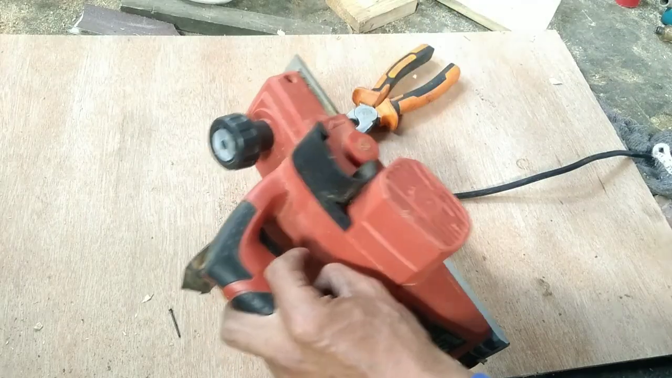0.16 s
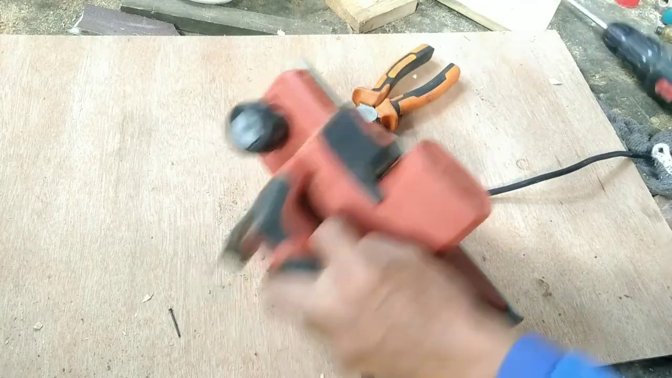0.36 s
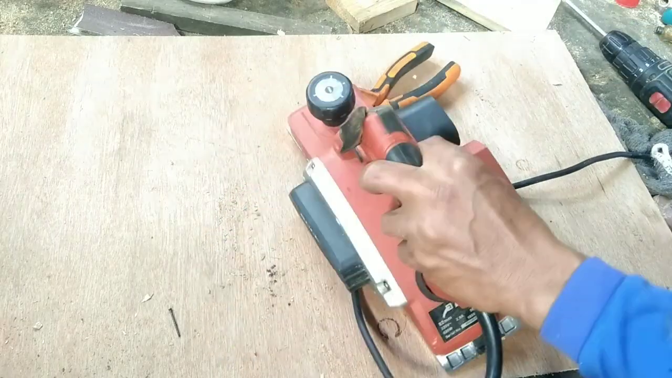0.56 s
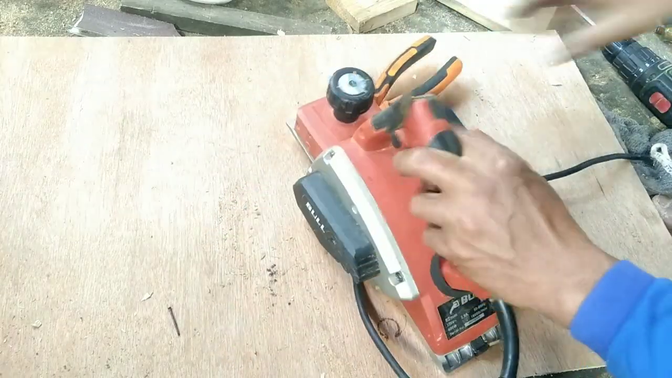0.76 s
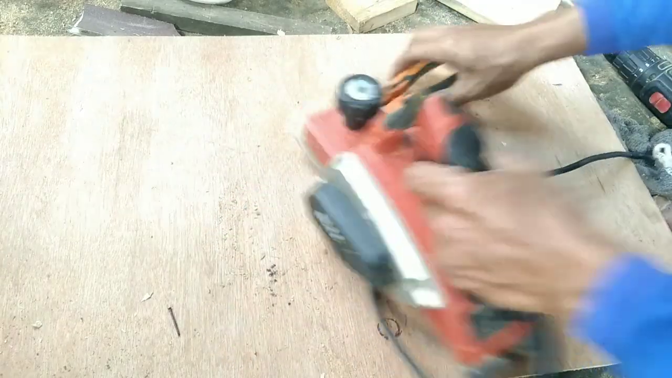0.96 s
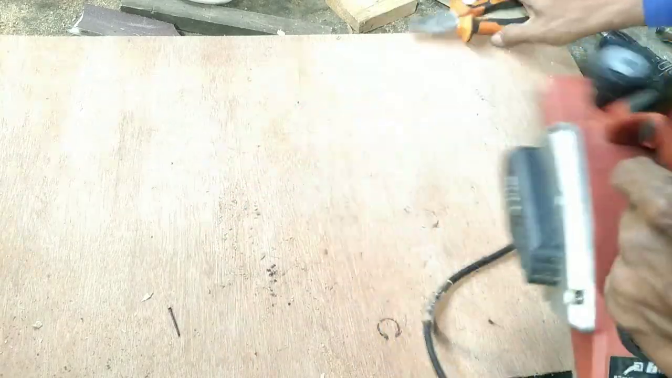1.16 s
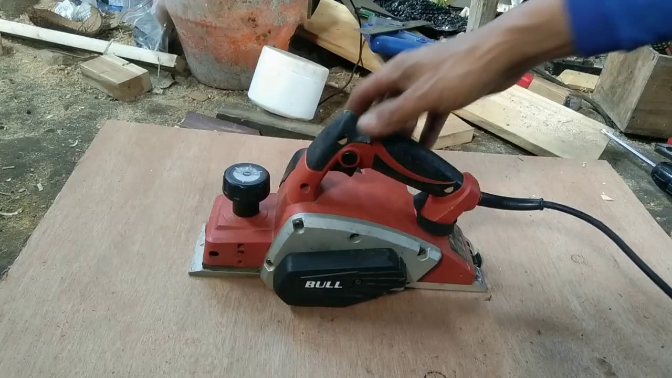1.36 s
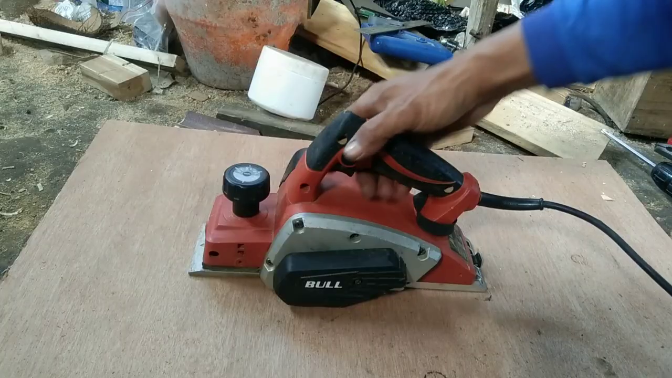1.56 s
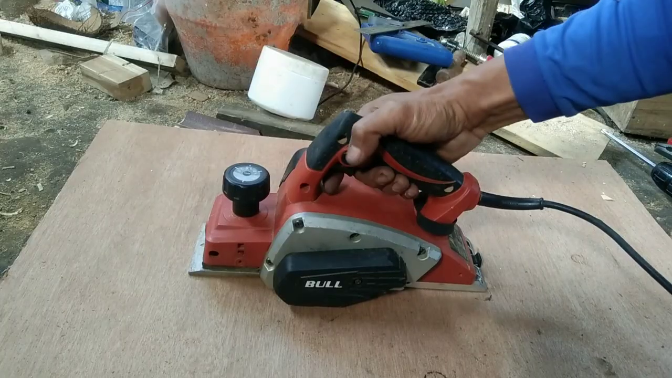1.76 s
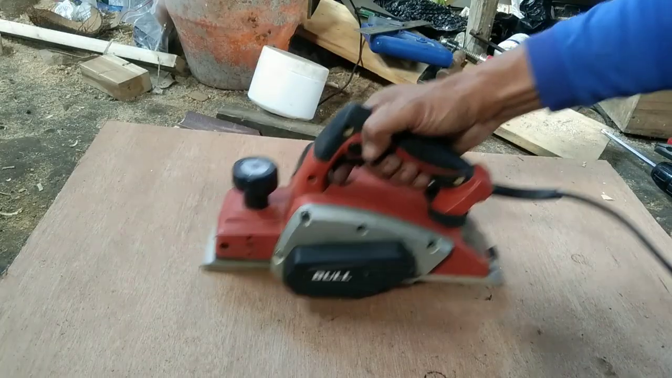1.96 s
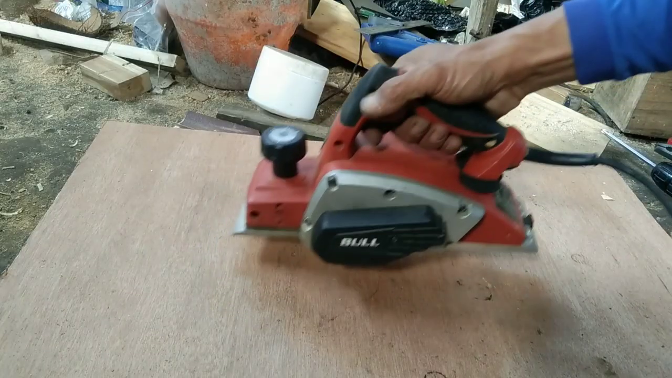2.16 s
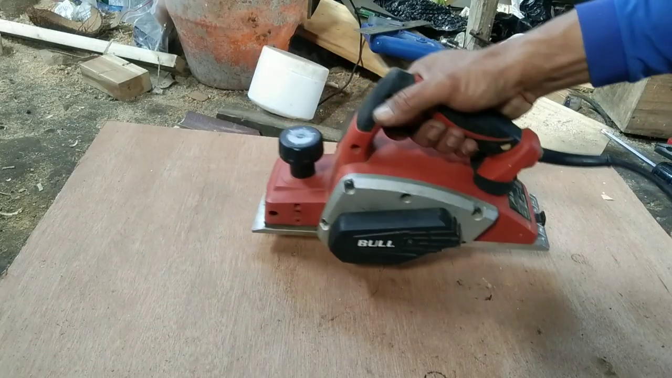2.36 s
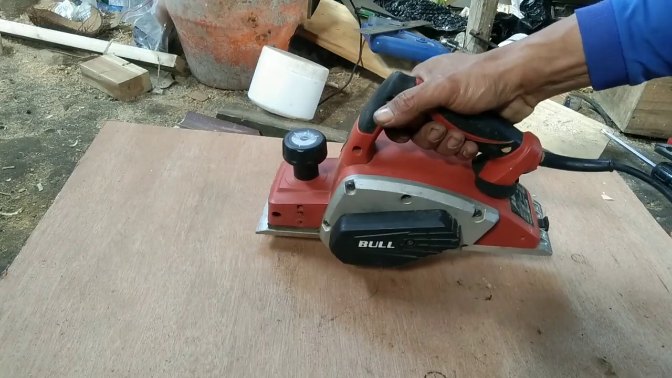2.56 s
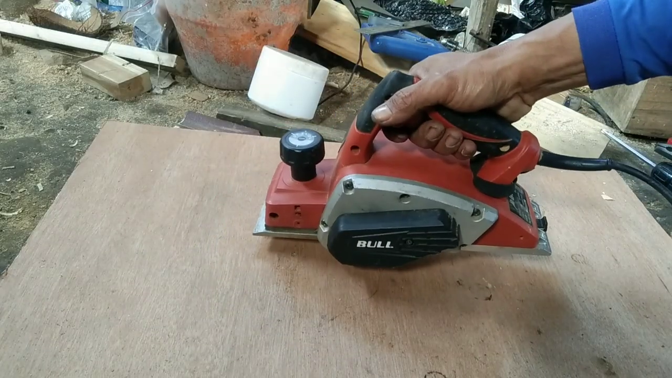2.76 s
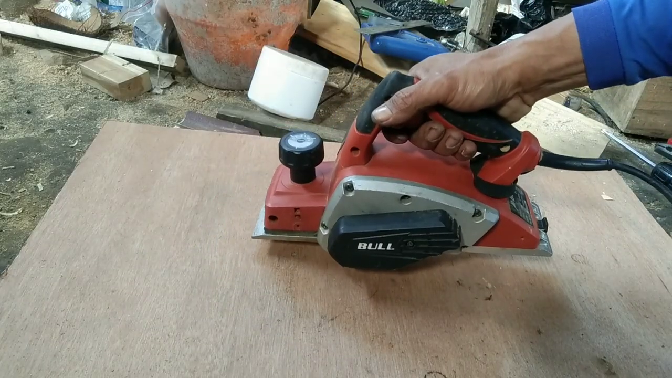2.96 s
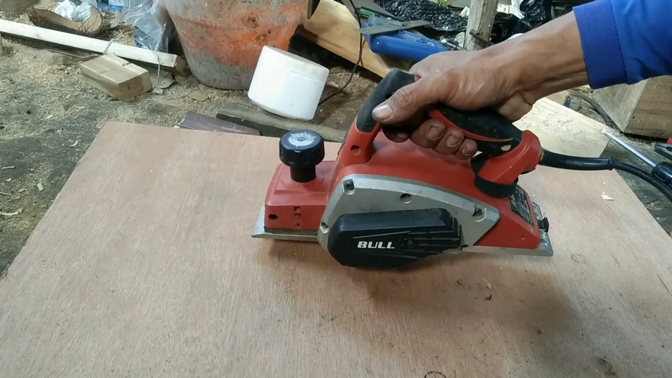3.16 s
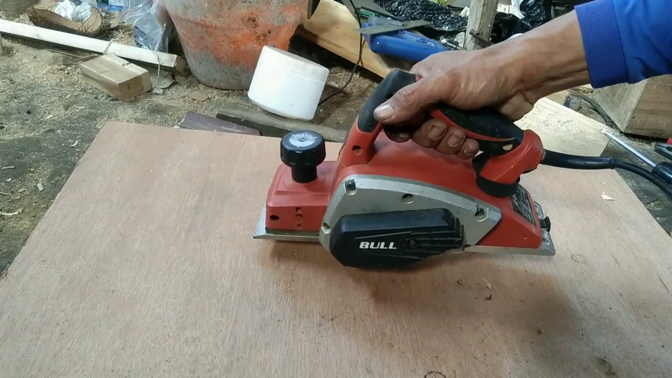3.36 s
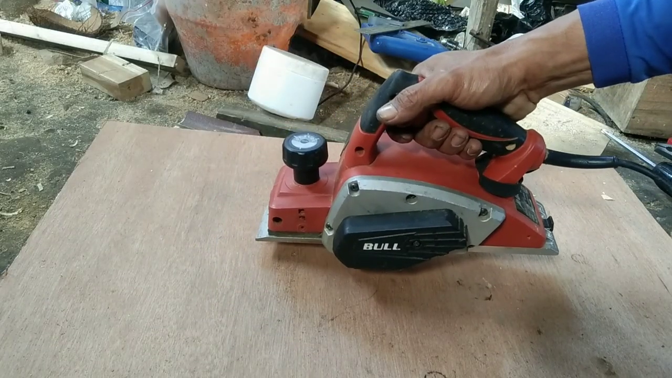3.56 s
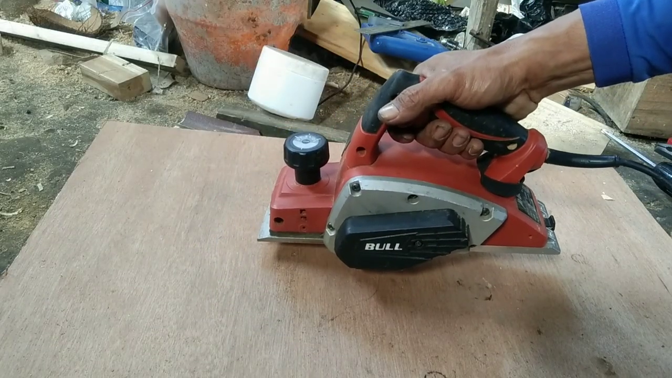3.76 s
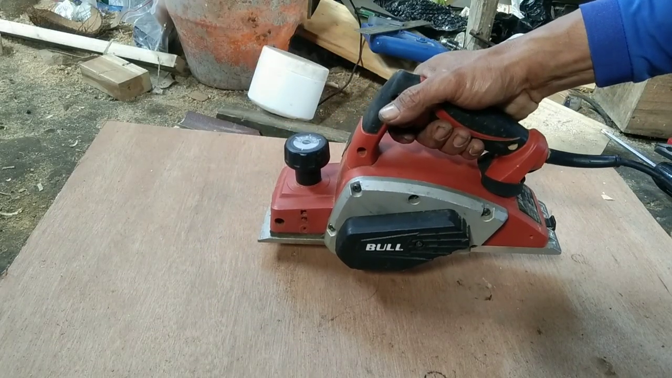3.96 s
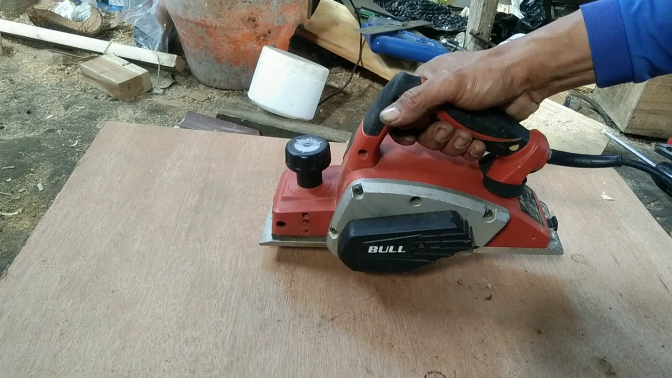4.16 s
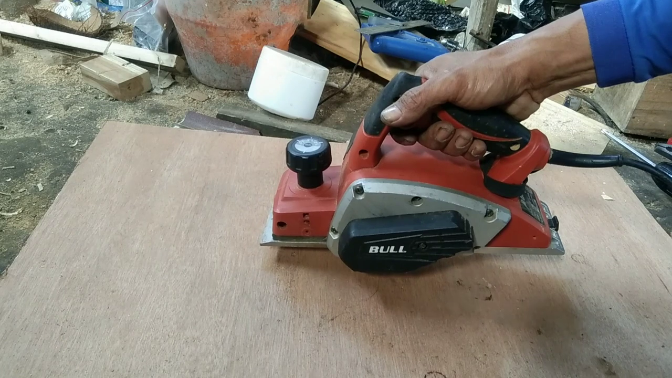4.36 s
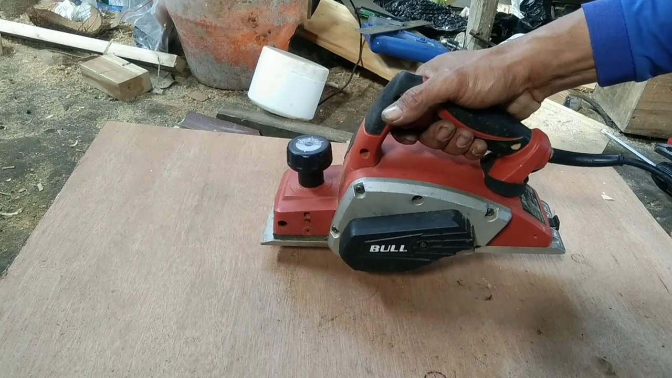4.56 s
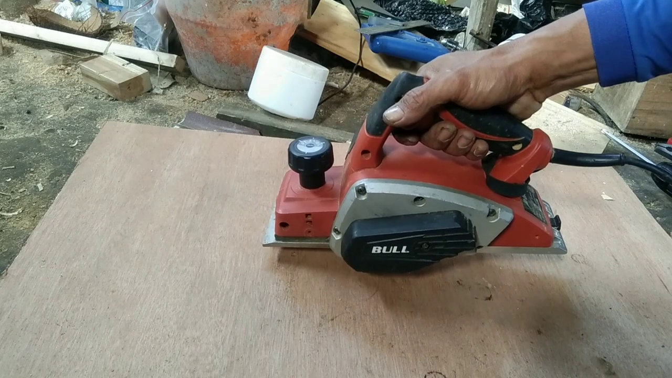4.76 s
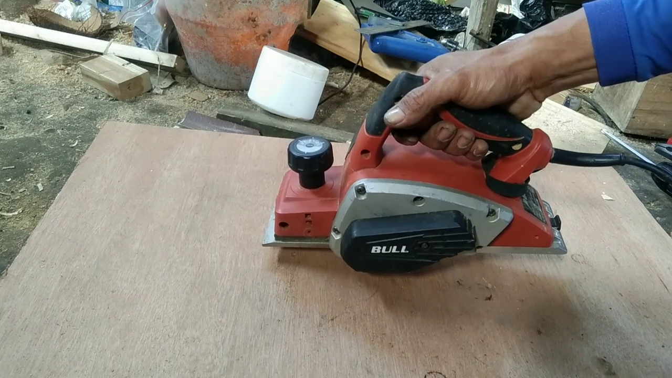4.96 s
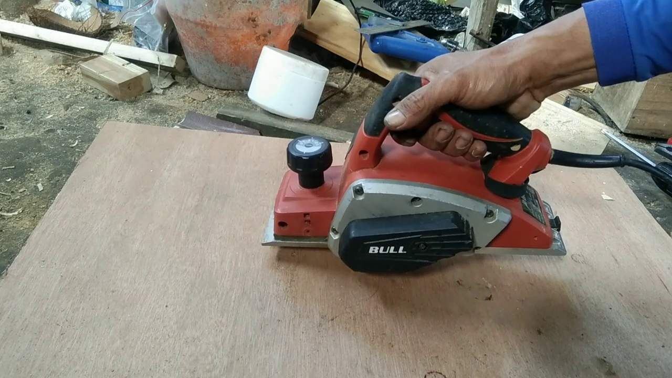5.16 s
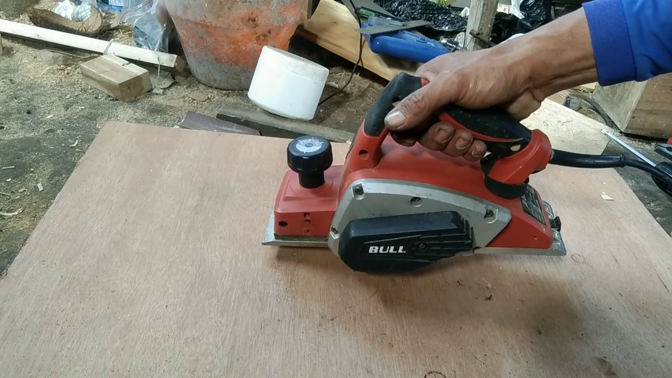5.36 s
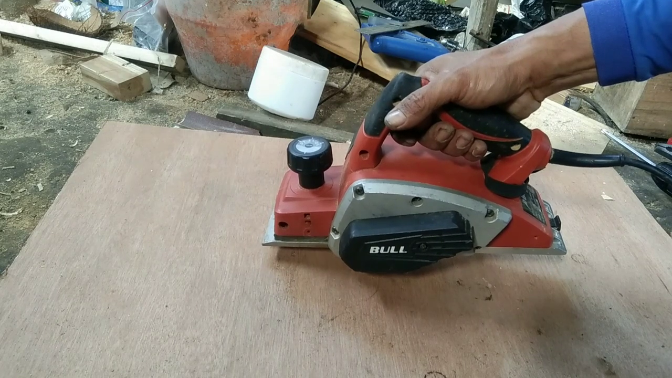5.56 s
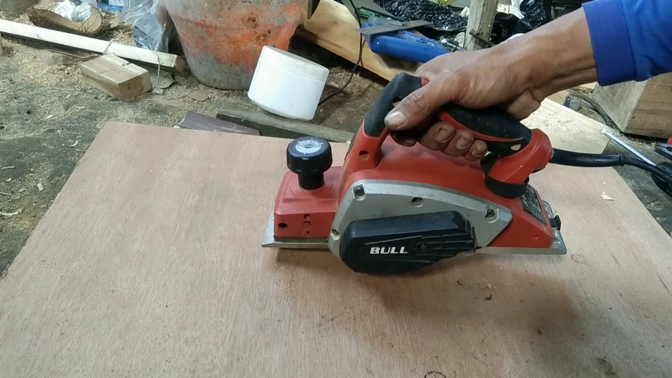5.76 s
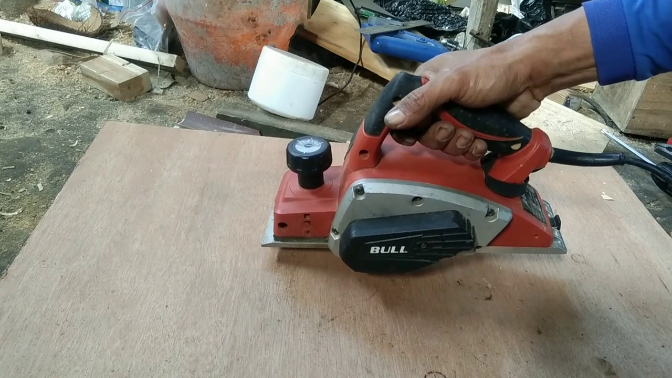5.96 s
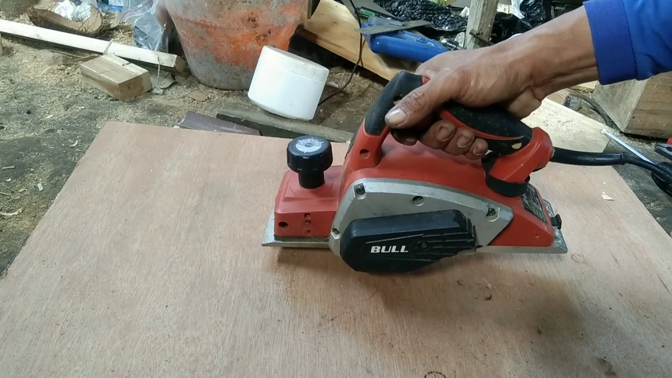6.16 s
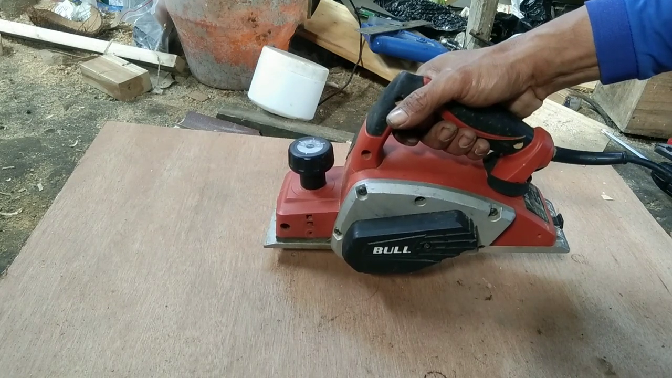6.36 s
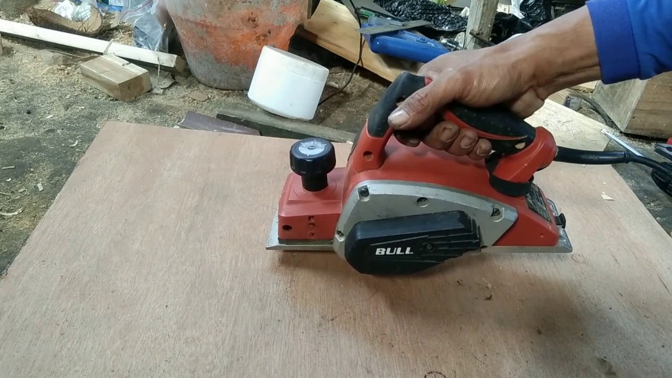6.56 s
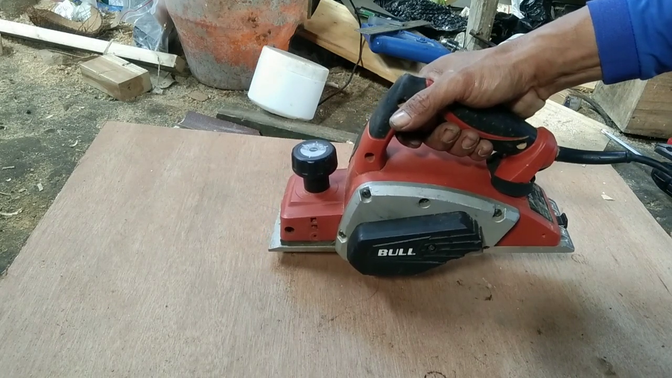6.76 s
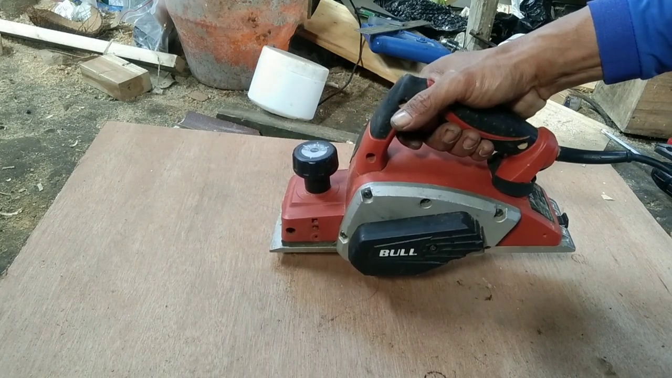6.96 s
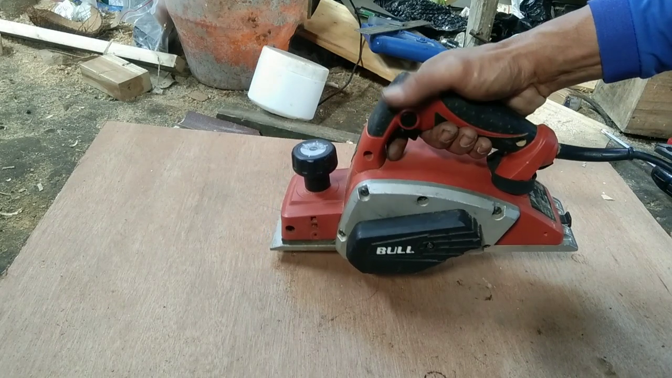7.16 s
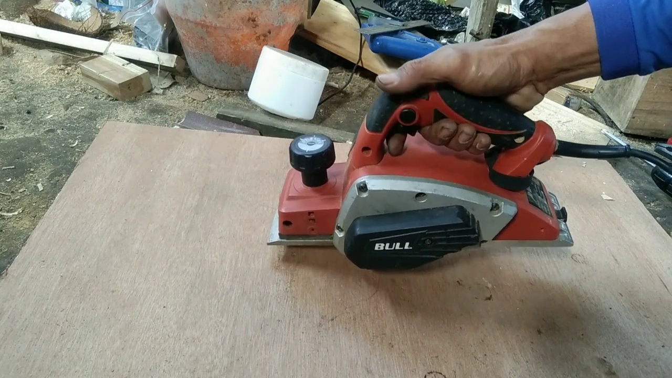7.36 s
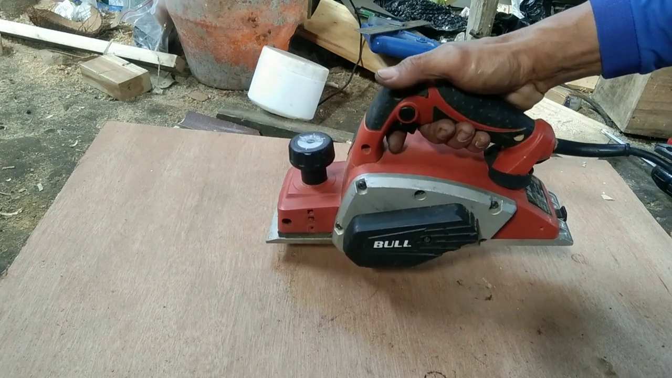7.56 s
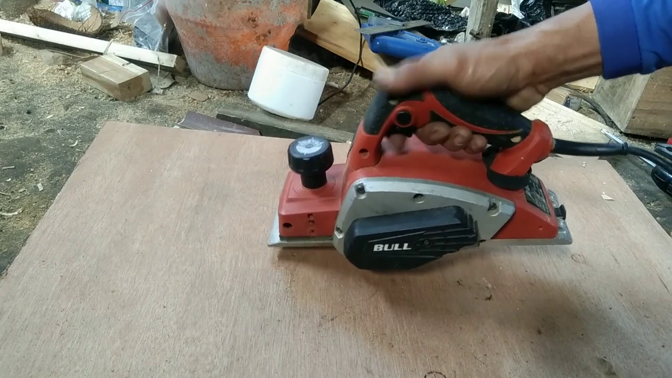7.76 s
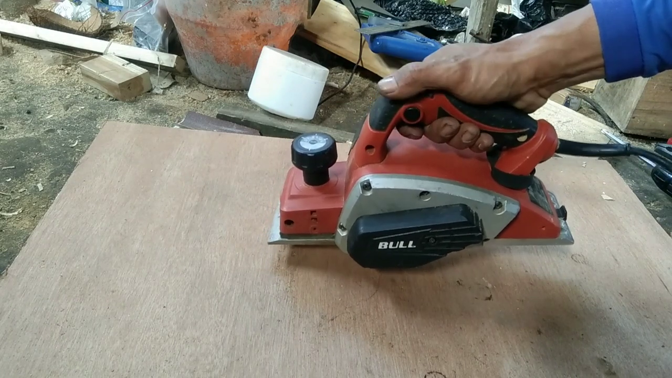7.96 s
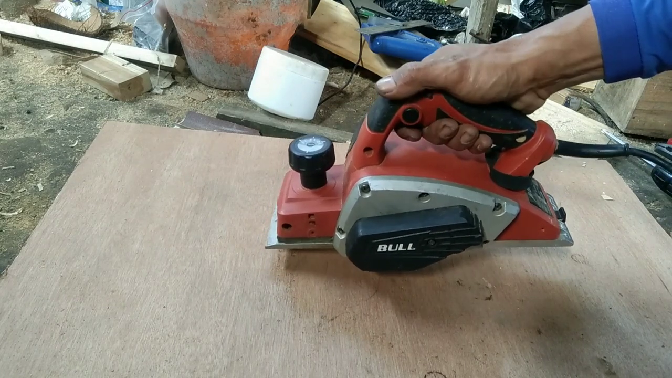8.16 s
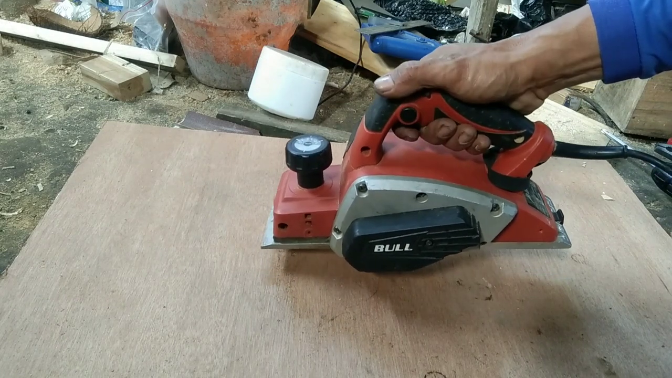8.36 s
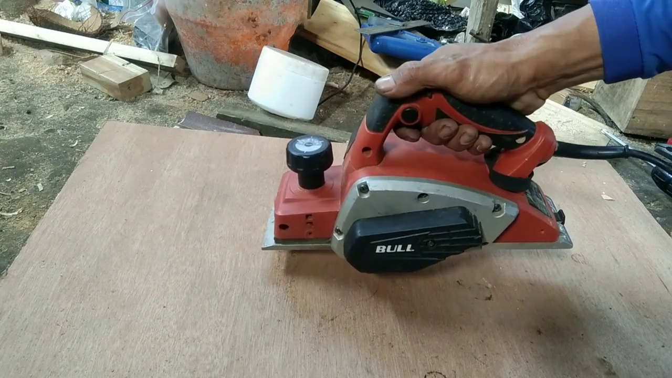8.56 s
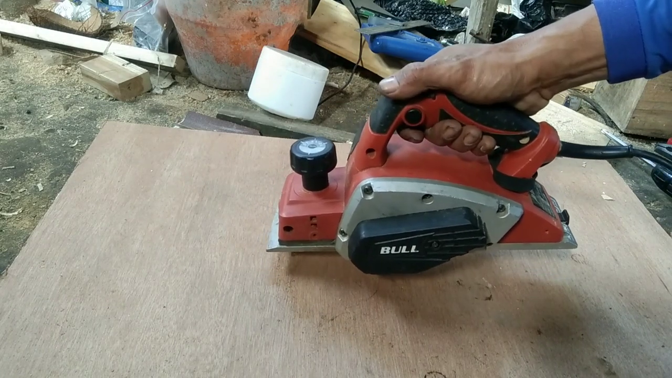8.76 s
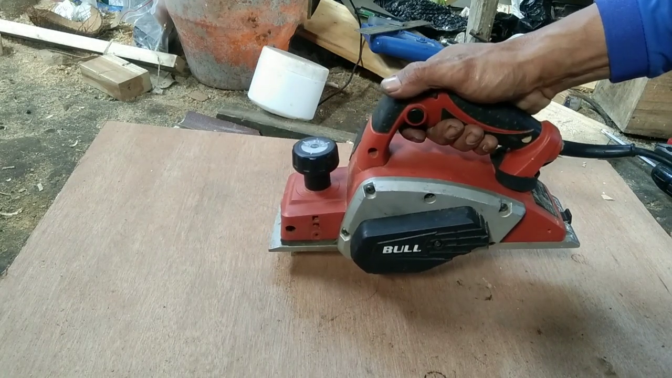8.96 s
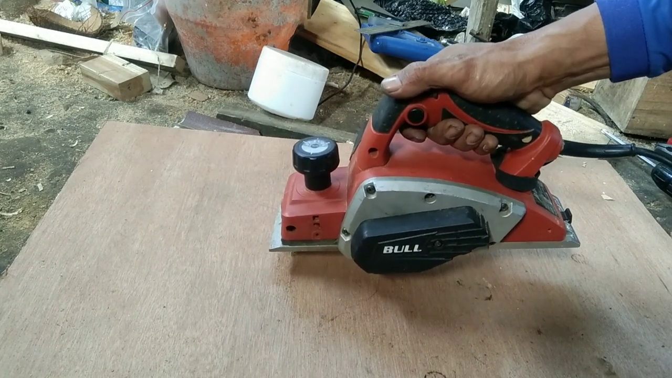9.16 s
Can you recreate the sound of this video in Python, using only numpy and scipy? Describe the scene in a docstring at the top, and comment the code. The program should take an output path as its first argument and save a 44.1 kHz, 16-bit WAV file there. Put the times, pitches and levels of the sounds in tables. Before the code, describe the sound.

Close, dry handling on a plywood bench: small ticks, then a cluster of woody knocks and short scrapes as an electric planer is turned over. A faint hiss swells and fades with soft bumps. The trigger clicks, the belt chirps, and the motor winds up fast into a loud steady whine with rushing air. Near the end it coasts down briefly, then revs up again.

```python
"""Light ticks and woody knocks: a screwdriver is put down and a hand planer turned over on a plywood bench.
Dense slips of noise make the scrapes, decaying modes the ring of plywood and steel; a hiss swells and sinks.
Switched on, the belt squeaks and the motor winds up, runs free, coasts for a moment and winds up again.
One turning rate drives the cutter drum's hum and the whine of armature slots and ball bearing, all built from
wavering sine partials, and the air rushing through the housing, which is coloured noise."""
import sys
import numpy as np
from scipy import signal
from scipy.fft import rfft, irfft, next_fast_len
from scipy.io import wavfile
from scipy.ndimage import uniform_filter1d

SR = 44100
rng = np.random.default_rng(int(sys.argv[2]) if len(sys.argv) > 2 else 0)


def store_wav(level_fs):
    """Save 16-bit WAV to argv[1]."""
    pcm = np.round(np.clip(np.atleast_2d(level_fs), -1, 1) * 32767)
    wavfile.write(sys.argv[1], SR, pcm.T.astype(np.int16))


N = 405719
T = np.arange(N) / SR

# Pulls of the trigger; the blade rate leaps up, then creeps on, each with its own time constant:
# [on_s, off_s, leap_hz, leap_time_s, creep_hz, creep_time_s]
TRIGGER_PULLS = [(2.4, 7.22, 263.07, .226, 149.96, 2.101), (7.975, 9.3, 175.6, .206, 75.7, .76)]
# Partials of the cutter: [multiple of the blade rate, level_db] and [multiple of the drum's turn, level_db]
BLADE_ORDERS = [(1, -25), (2, -25), (3, -29)]
DRUM_ORDERS = [(1, -52.5), (8, -42), (10, -40), (12, -43), (18, -48), (26, -48), (30, -44), (40, -43)]
# Partials of the motor hum: [multiple of the armature's turn, level_db]
ARMATURE_ORDERS = [(1, -9.5), (2, 1.5), (3, -12), (4, -5), (5, -2.5), (7, -2), (10, -7)]
# Partials of the bearing: [multiple of the ball pass rate, level_db]
BEARING_ORDERS = [(1, -38.5), (2, -49), (3, -34.5), (4, -34), (5, -30), (6, -30.5), (7, -32.5), (8, -35),
                  (9, -34.5), (10, -33.5), (11, -47.5), (12, -29.5), (13, -28.5), (14, -35), (16, -34)]
# Bench and housing resonances that the low tones sweep through: [frequency_hz, gain_db]
BODY_RESPONSE = [(170, -6), (245, 1), (305, -12.5), (340, -3), (382, 0), (402, -5), (450, -3.5), (610, 1.5),
                 (740, -9.5), (790, -16), (830, 6), (960, -1), (1120, 4), (1160, -2.5), (1250, -6.5)]
# How the motor shell radiates the slot whine: [frequency_hz, gain_db]
SHELL_RESPONSE = [(1000, -27), (1900, -17), (2400, -6.5), (2700, -9), (3050, 1), (3350, 2.5), (3600, -3.5),
                  (3900, 0), (4130, -2.5), (4300, -9.5)]
# What the housing does to the bearing's tones: [frequency_hz, gain_db]
HOUSING_RESPONSE = [(500, -17), (800, 1.5), (1500, -10), (2900, -2), (3700, 2), (4300, -6), (5100, -1.5),
                    (5520, 5), (6000, -5.5), (7500, -6), (9300, -9.5), (10500, -3.5), (11700, -19),
                    (15500, -23)]
# Drum wind, fan rush and vent hiss, one row each; the knee is where the layer levels off, the surge is
# extra level at full starting current: [level_db, knee_share_of_full_speed, surge_db]
AIR_LAYERS = [(3.5, 0.24, -4), (8.5, 0.3, 7.5), (5.5, 0.43, -4)]
# Spectrum of the rushing air: [frequency_hz, level_db_per_hz]
AIR_COLOUR = [(40, -78), (100, -90), (280, -80.5), (450, -68), (620, -58), (900, -64), (1400, -67.5),
              (2900, -70.5), (3500, -63), (4400, -65.5), (7000, -63), (10500, -71.5), (12500, -79),
              (15500, -82)]

# Blows of the planer on the bench: [start_s, level_db, treble_db, bass_db]
KNOCKS = [(0.323, -38.5, -8, 1), (0.402, -37, 14, 8), (0.451, -35, 9, 13), (0.58, -37.5, 11, 16),
          (0.666, -36, -1, -10), (0.697, -22.5, 3, 2), (0.741, -33, -3, -11), (0.778, -35, -6, -5),
          (0.848, -28.5, 1, 12), (0.852, -14.5, 2, -9), (1.024, -44, -3, 15), (1.061, -12.5, 2.5, 0),
          (1.109, -27, -5, 6), (1.212, -40, 2, 4), (1.346, -45, -8, -5)]
# Spectrum of a knock's crack: [frequency_hz, level_db_per_hz]
KNOCK_COLOUR = [(71, -59), (120, -58), (474, -19), (604, -9), (1180, -8), (1500, -4.5), (1910, -10.5),
                (2070, -13.5), (3100, -16), (5920, -34), (8350, -26), (15000, -52)]
# Ringing modes of the plywood: [pitch_hz, level_db, t60_s]
BENCH_MODES = [(524, -13, 0.13), (984, -16, 0.1), (1054, 9.5, 0.058), (1150, 4.5, 0.11), (1260, -19, .1),
               (1350, 1, 0.087), (1670, -11, .08), (1940, -8, 0.081), (2460, -10, 0.08), (3170, -11, .08)]
# Light ticks of steel and plastic: [start_s, level_db, steel_ring_db]
TICKS = [(0.0747, -36, -16), (0.085, -37.5, -6), (0.1531, -39, -2), (0.312, -50, -10), (0.8924, -25.5, -31),
         (1.235, -25, -16), (1.3633, -41, -6), (2.3174, -39, -30), (2.397, -26, -12)]
# Ringing modes of the steel: [pitch_hz, level_db, t60_s]
STEEL_MODES = [(1380, -4, 0.29), (2300, -16, 0.38), (2480, -11, 0.42), (4040, -10, 0.32), (6826, -7, 0.27),
               (8100, -10, 0.47), (10080, -4, 0.45), (10360, -10, .3), (11000, -12, .25)]
# Dense steel overtones between those modes: [frequency_hz, level_db_per_hz]
STEEL_SHIMMER = [(1000, -15), (2400, -1), (5000, -9), (9500, -1), (12000, -12)]
# The sole bumps as the planer is lifted: [start_s, level_db]
BUMPS = [(1.892, -26), (1.913, -33), (1.977, -35), (2.02, -25)]
# The body slides over the wood: [start_s, length_s, level_db]
SLIDES = [(0.364, 0.16, -45), (0.622, 0.12, -47), (0.808, 0.13, -55), (1.063, 0.15, -43), (1.19, 0.11, -45),
          (1.346, 0.04, -57), (2.03, 0.09, -55)]
# The fingers tighten on the plastic handle: [start_s, length_s, level_db]
GRIP_RUBS = [(2.075, 0.048, -36.5)]
# Spectra of wood scrape and grip rub: [frequency_hz, level_db_per_hz]
SCRAPE_COLOUR = [(71, -76), (120, -34), (380, -16), (446, -36), (655, -32), (725, -10), (1110, -2),
                 (1500, -15.5), (2860, -19), (3430, -27), (6420, -28), (7860, -25), (15000, -31)]
GRIP_COLOUR = [(1500, -12), (2100, 4), (2800, -5), (4000, -13), (7000, -6), (14000, -26)]

# Spectra of the workshop's hiss, low rumble and steady quiet bed: [frequency_hz, level_db_per_hz]
HISS_COLOUR = [(120, -34), (200, -9), (244, 2.5), (273, -17), (365, -2.5), (690, -3.5), (783, -6),
               (1260, -7), (1980, -8), (7350, -7), (15500, -29)]
RUMBLE_COLOUR = [(30, -29), (70, -9), (100, 8), (135, -3), (250, -12), (600, -20), (1200, -37)]
QUIET_COLOUR = [(40, -35), (100, -8), (700, -24), (1300, -1), (1700, -12), (2300, -6), (5800, -20),
                (9000, -9), (15500, -28)]
# Swells of the rumble: [start_s, length_s, level_db]
RUMBLE_SWELLS = [(1.61, 0.24, -48), (2.22, 0.22, -52)]

# Armature turns per drum turn; ball passes and slots per armature turn
BELT_RATIO, BALL_PASSES, SLOTS = 1.8055, 2.5815, 12
THROB_HZ = 2 * 50  # the current peaks on each half wave of the mains
# Coasting: steady friction, and drag in proportion to speed; FREE_HZ is the blade rate when running free
FRICTION_HZ_PER_S, DRAG_PER_S, FREE_HZ = 158, .55, 400
SPEED_EXPONENT = 3.2  # how steeply the low tones grow with speed
TONES_DB, HUM_DB = 4, -31.5  # all running tones together; the armature hum among them
# The slot whine under power; its change when coasting; its gain per share of missing speed on the second pull
SLOT_DB, SLOT_COAST_DB, SLOT_RESTART_DB = -27, -18, 10.5
# One bearing overtone flares on the first wind-up; all ease off when coasting
STRAINED_ORDER, BEARING_STRAIN_DB, BEARING_COAST_DB = 6, 6, -2
CHIRP_AT_S, CHIRP_S, CHIRP_DB = 2.398, .007, -10.5
SQUEAK_HZ, SQUEAK_SAG_HZ_PER_S, SQUEAK_DB, SQUEAK_FADE_DB_PER_S = 9960, 10000, -23, 123
HISS_FROM_S, HISS_UNTIL_S, HISS_ATTACK_S, HISS_FADE_DB_PER_S, HISS_DB = 1.355, 2.06, 0.15, 60, -43.5
RUMBLE_FROM_S, RUMBLE_UNTIL_S, RUMBLE_DB = 1.376, 2.7, -50.5
GAIN_THRESHOLD_DB, GAIN_RATIO, GAIN_RESPONSE_S = -17.5, 12, 0.035
CEILING, TOP_HZ = 0.86, 15650  # full scale is 1


def undb(db):
    """Decibels to gain."""
    return 10 ** (np.asarray(db) / 20)


def unit(x):
    """Scale to rms 1."""
    return x / np.sqrt(np.mean(x ** 2))


def since(s):
    """Seconds since a moment; 0 before it."""
    return np.maximum(T - s, 0)


def between(start, end, fade=0.0082):
    """1 from start to end, with short ramps."""
    return np.clip((T - start) / fade, 0, 1) * np.clip((end - T) / fade, 0, 1)


def swells(table):
    """A gain that rises and falls in one arch for each (start_s, length_s, level_db) row."""
    return sum(undb(db) * np.sin(np.pi * np.clip(since(s) / length, 0, 1)) for s, length, db in table)


def fade_out(t60, size):
    """An exponential decay that falls 60 dB in t60 seconds."""
    return undb(-60 * T[:size] / t60)


def walk(rate):
    """Smooth chance of spread 1 that changes about rate times a second."""
    hold = max(int(SR / rate), 1)
    steps = np.repeat(rng.standard_normal(N // hold + 1), hold)
    return unit(uniform_filter1d(steps, hold)[:N])


def gain_at(hz, spectrum):
    """Gain of a spectrum in dB at the given frequencies, read along a log frequency scale."""
    points, db = np.transpose(spectrum)
    return undb(np.interp(np.log(hz + 1), np.log(points), db))


def colour(x, spectrum):
    """Filter by a spectrum in dB."""
    size = next_fast_len(len(x))
    gain = gain_at(np.fft.rfftfreq(size, 1 / SR), spectrum)
    return irfft(rfft(x, size) * gain, size)[:len(x)]


def noise(spectrum, size=N):
    """Coloured noise of rms 1."""
    return unit(colour(rng.standard_normal(size), spectrum))


def split(x, hz):
    """The parts below and above a frequency."""
    lowpass = signal.butter(2, min(hz, .45 * SR), fs=SR, output="sos")
    low = signal.sosfiltfilt(lowpass, x)
    return low, x - low


def tone(turns, multiple, waver_db, rough):
    """One partial of a turning part, about rms 1: it wavers slowly and flutters quickly."""
    phase = 2 * np.pi * (round(multiple) * turns + rng.random()) + rough * walk(90)
    return np.sqrt(2) * np.sin(phase) * undb(waver_db * walk(9)) * (1 + rough * walk(130))


def ring(modes, size):
    """Decaying modes; each blow excites them a little differently."""
    out = np.zeros(size)
    for hz, db, t60 in modes:
        level = undb(db + rng.normal(0, 3.0))
        phase = 2 * np.pi * hz * T[:size] + rng.uniform(0, 2 * np.pi)
        out += level * fade_out(t60, size) * np.sin(phase)
    return out


def add(track, s, sound, peak_db):
    """Mix a sound in at a time, with a given peak."""
    start = int(s * SR)
    scaled = undb(peak_db) * sound / np.abs(sound).max()
    track[start:start + len(sound)] += scaled[:N - start]


def room(x, wet_db, t60):
    """A short diffuse tail from the cluttered workshop."""
    size = SR // 2
    tail = noise([(100, -5.0), (1200, 10.0), (4000, 0.5), (15000, -4.5)], size)
    tail = tail * fade_out(t60, size) * (T[:size] > .006)  # a short gap before the reflections
    return x + undb(wet_db) * signal.fftconvolve(x, tail / np.linalg.norm(tail))[:N]


def planer():
    """The drum and, through the belt, the faster armature drive every running sound."""
    blade_hz = blade_rate()
    drum_hz = blade_hz / 2 * (1 + 0.000866 * walk(14))  # two blades; the speed wanders slightly
    drum = np.cumsum(drum_hz) / SR
    armature, armature_hz = BELT_RATIO * drum, BELT_RATIO * drum_hz
    speed = blade_hz / FREE_HZ
    power = sum(between(on, off) for on, off, *_ in TRIGGER_PULLS)
    current = power * (1 - speed)  # the starting current falls as the motor gains speed
    strain = current * between(*TRIGGER_PULLS[0][:2])
    balls = undb(BEARING_COAST_DB * (1 - power)) * bearing(armature, armature_hz, speed, strain)
    tones = cutter(drum, blade_hz, speed) + motor(armature, armature_hz, speed, power) + balls
    # late reflections lag behind a gliding pitch and smear it
    low, high = split(undb(TONES_DB) * tones, 840)
    running = low + room(high, wet_db=-11.5, t60=0.19) + air(drum, armature, speed, power, current)
    running *= between(TRIGGER_PULLS[0][0], TRIGGER_PULLS[-1][1], fade=0.0036)
    return running + belt_squeak() + start_up(armature, armature_hz)


def blade_rate():
    """Blade passes per second: each pull winds the motor up from its present speed; released, it coasts down."""
    hz, friction = np.zeros(N), FRICTION_HZ_PER_S / DRAG_PER_S
    for on, off, leap_hz, leap_s, creep_hz, creep_s in TRIGGER_PULLS:
        leap = -leap_hz * np.expm1(-since(on) / leap_s)
        creep = -creep_hz * np.expm1(-since(on) / creep_s)
        driven = np.interp(on, T, hz) + leap + creep
        coasting = (np.interp(off, T, driven) + friction) * np.exp(-DRAG_PER_S * since(off)) - friction
        hz = np.select([T < on, T < off], [hz, driven], coasting)
    return np.maximum(hz, 1)


def cutter(turns, blade_hz, speed):
    """Two blades chop the air at the slot in the sole; the drum is slightly out of balance."""
    low = sum(undb(db) * gain_at(k * blade_hz, BODY_RESPONSE) * tone(2 * turns, k, waver_db=1.5, rough=0.085)
              for k, db in BLADE_ORDERS)
    high = sum(undb(db) * tone(turns, k, waver_db=1.5, rough=0.4) for k, db in DRUM_ORDERS)
    return low * speed ** SPEED_EXPONENT + high * speed ** 2.4


def motor(turns, hz, speed, power):
    """The armature hums; its slots whine, throbbing with the current on each half wave of the mains."""
    hum = sum(undb(db) * gain_at(k * hz, BODY_RESPONSE) * tone(turns, k, waver_db=3.0, rough=0.05)
              for k, db in ARMATURE_ORDERS)
    throb = 1 + .9 * power * np.cos(2 * np.pi * THROB_HZ * T + .25 * walk(60))
    # the belt tugs once per turn of the drum
    wobble = 1 + .25 * np.cos(2 * np.pi * turns / BELT_RATIO)
    restart = (1 - speed) * between(*TRIGGER_PULLS[1][:2])
    slot_db = SLOT_DB + SLOT_COAST_DB * (1 - power) + SLOT_RESTART_DB * restart
    slot_gain = undb(slot_db) * gain_at(SLOTS * hz, SHELL_RESPONSE)
    whine = slot_gain * throb * wobble * tone(turns, SLOTS, waver_db=-0.4, rough=0.043)
    field = undb(-65) * power * tone(THROB_HZ * T, 1, waver_db=2, rough=.2)
    return undb(HUM_DB) * speed ** SPEED_EXPONENT * hum + whine + field


def bearing(turns, hz, speed, strain):
    """Balls roll over a flaw in the race; each overtone flares as it crosses a housing resonance."""
    passes = BALL_PASSES * turns + 0.016 * walk(35)  # the balls slip a little
    whine = np.zeros(N)
    for k, db in BEARING_ORDERS:
        level = undb(db + BEARING_STRAIN_DB * strain * (k == STRAINED_ORDER))
        # faster balls strike harder, so the high overtones grow most with speed
        level = level * speed ** (0.14 * k) * gain_at(k * BALL_PASSES * hz, HOUSING_RESPONSE)
        whine += level * tone(passes, k, waver_db=2.26, rough=0.089)
    # seven balls: the load varies once per turn of their cage
    load = 1 + 0.22 * np.cos(2 * np.pi * passes / 7)
    return whine * load


def air(drum_turns, armature_turns, speed, power, current):
    """Turbulence from drum and fan, chopped by the blades and roughened by the brushes."""
    rush = colour(rng.standard_normal(N), AIR_COLOUR) * np.sqrt(SR / 2)  # per-Hz levels to full-band noise
    wind, rest = split(rush, 2400)
    fan, hiss = split(rest, 3400)
    wind, fan, hiss = (band * undb(db + surge_db * current) * speed / np.hypot(speed, knee)
                       for band, (db, knee, surge_db) in zip((wind, fan, hiss), AIR_LAYERS))
    chop = 1 + 0.26 * np.cos(2 * np.pi * 2 * drum_turns)
    brushes = (1 + 0.057 * np.cos(2 * np.pi * armature_turns)
               + 0.011 * power * np.cos(2 * np.pi * THROB_HZ * T))
    rattle = undb(1.2 * walk(350))
    gusty_wind = undb(2.0 * walk(25)) * wind * chop
    gusty_fan = undb(1.9 * walk(18)) * fan + undb(.5 * walk(15)) * hiss
    return gusty_wind + gusty_fan * brushes * rattle


def belt_squeak():
    """The belt slips on its pulley: a clean chirp, then ragged squeaks that sink and die as it grips."""
    age = since(CHIRP_AT_S)
    ragged = np.clip((age - CHIRP_S) / .01, .15, 1)
    hz = SQUEAK_HZ - SQUEAK_SAG_HZ_PER_S * np.minimum(age, .5)
    phase = 2 * np.pi * np.cumsum(hz * (1 + .04 * ragged * walk(1400))) / SR
    chirp = undb(CHIRP_DB) * between(CHIRP_AT_S, CHIRP_AT_S + CHIRP_S, fade=0.0013)
    tail = undb(SQUEAK_DB - SQUEAK_FADE_DB_PER_S * age + 2.9 * walk(300)) * (age > CHIRP_S / 2)
    return np.sqrt(2) * np.sin(phase) * (chirp + tail)


def start_up(turns, armature_hz):
    """At low speed the motor growls, and the inrush current makes it buzz and chirp."""
    body = [(400, -35), (540, 0), (650, 0), (850, 1), (1000, -12), (1500, -35)]
    shell = [(2600, -30), (3100, 0), (3800, 0), (4200, -30)]
    # the field laminations buzz at first
    buzz = sum(gain_at(k * THROB_HZ, body) * tone(THROB_HZ * T, k, waver_db=2, rough=.4) for k in range(5, 9))
    # an overtone of the slow drum sweeps through the same resonance
    sweep = gain_at(10 * armature_hz / BELT_RATIO, body) * tone(turns / BELT_RATIO, 10, waver_db=1, rough=.2)
    # slot overtones chirp through the housing's ring
    chirps = sum(gain_at(k * SLOTS * armature_hz, shell) * tone(turns, k * SLOTS, waver_db=1, rough=.7)
                 for k in (2, 3, 5))
    return (undb(-37) * chirps * between(1.9, 3.0, fade=0.026)
            + undb(-34.5) * buzz * between(2.4, 2.5, fade=0.032)
            + undb(-27.0) * sweep * (T > TRIGGER_PULLS[0][0]))


def knocks(size=SR // 2):
    """Each blow cracks, rings the plywood and leaves a low thud."""
    out = np.zeros(N)
    thud_colour = [(50, -42), (100, -37), (200, 1.0), (600, 3), (1200, -14.5)]
    for s, db, treble_db, bass_db in KNOCKS:
        low, high = split(noise(KNOCK_COLOUR, size), 1800)
        crack = (low + undb(treble_db) * high) * fade_out(0.067, size)
        plywood = undb(-7.5) * ring(BENCH_MODES, size)
        thud = undb(bass_db - 15) * noise(thud_colour, size) * fade_out(0.29, size)
        add(out, s, crack + plywood + thud, db + 0.36)
    return out


def ticks(size=SR // 2):
    """Hard, light contacts; steel rings on faintly."""
    out = np.zeros(N)
    click_colour = [(300, -3), (1500, 4), (2500, 0), (4000, -2.0), (9000, -2.5), (15000, -6.0)]
    for s, db, ring_db in TICKS:
        click = noise(click_colour, size) * fade_out(0.036, size)
        shimmer = noise(STEEL_SHIMMER, size) * fade_out(.5, size)
        steel = undb(-9) * (ring(STEEL_MODES, size) + shimmer)
        add(out, s, click + undb(ring_db) * steel, db + .5)
    return out


def bumps(size=SR // 3):
    """Soft, dull contacts of the sole with the bench: short, dark noise bursts."""
    out = np.zeros(N)
    dull = [(70, -8), (250, 4.5), (430, 4), (620, 4), (900, -17), (2000, -24), (8000, -42)]
    for s, db in BUMPS:
        add(out, s, noise(dull, size) * fade_out(0.06, size), db + .5)
    return out


def scrape():
    """Dense, uneven slips of the body on the wood and of the hand on the grip; each swells and dies away."""
    slips = rng.standard_normal(N) * undb(2.7 * walk(460))
    wood = unit(colour(slips, SCRAPE_COLOUR)) * swells(SLIDES) * undb(0.93 * walk(52.3))
    grip = unit(colour(slips, GRIP_COLOUR)) * swells(GRIP_RUBS)
    return wood + grip


def workshop():
    """Near silence, then a broad hiss that swells, holds and sinks over a low rumble."""
    swell = np.minimum(since(HISS_FROM_S) / HISS_ATTACK_S, 1)
    hiss_gain = undb(HISS_DB - HISS_FADE_DB_PER_S * since(HISS_UNTIL_S)) * swell
    steady_rumble = undb(RUMBLE_DB) * between(RUMBLE_FROM_S, RUMBLE_UNTIL_S, fade=0.094)
    rumble = (steady_rumble + swells(RUMBLE_SWELLS)) * noise(RUMBLE_COLOUR)
    return hiss_gain * noise(HISS_COLOUR) + rumble + undb(-72) * noise(QUIET_COLOUR)


def scene():
    """Handling, the running planer and the workshop; both channels are alike."""
    handling = room(knocks() + ticks() + bumps(), wet_db=-13.5, t60=0.16) + scrape()
    return np.tile(handling + planer() + workshop(), (2, 1))


def gain_control(x):
    """Turns loud passages down, so the rush of air ducks when a loud tone swells."""
    step = 1 / (GAIN_RESPONSE_S * SR)
    loudness = np.sqrt(signal.lfilter([step], [1, step - 1], x[0] ** 2))
    excess = np.maximum(loudness / undb(GAIN_THRESHOLD_DB), 1)
    return x * excess ** (1 / GAIN_RATIO - 1)


def record(dry):
    """The phone thins the deep bass, rides the gain, rounds the highest peaks and cuts the top."""
    bass_cut = signal.butter(2, 60, "highpass", fs=SR, output="sos")
    levelled = gain_control(signal.sosfilt(bass_cut, dry))
    rounded = levelled / (1 + (levelled / CEILING) ** 8) ** (1 / 8)
    top_cut = signal.ellip(10, .1, 80, TOP_HZ, fs=SR, output="sos")
    return signal.sosfilt(top_cut, rounded)


dry = scene()
out = record(dry)
store_wav(out)
```